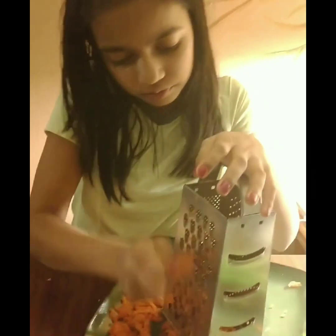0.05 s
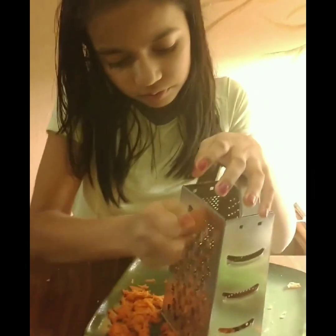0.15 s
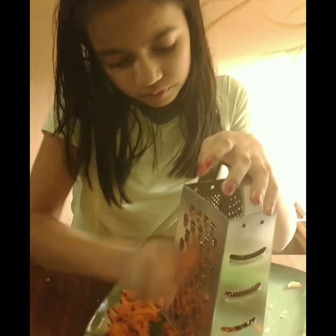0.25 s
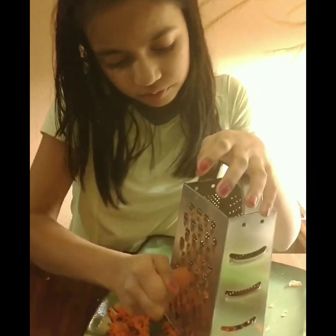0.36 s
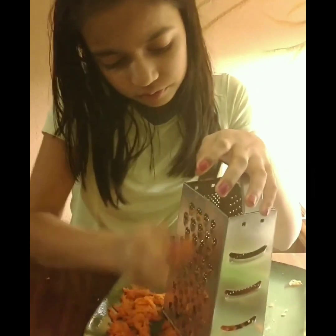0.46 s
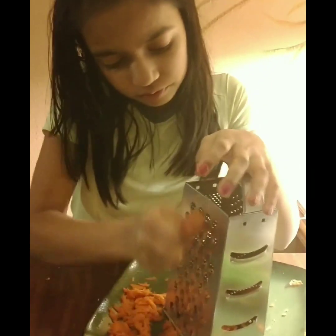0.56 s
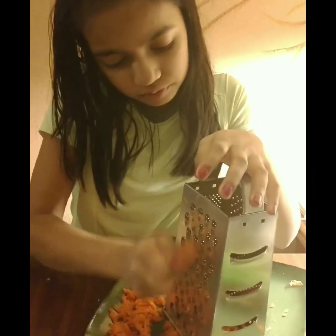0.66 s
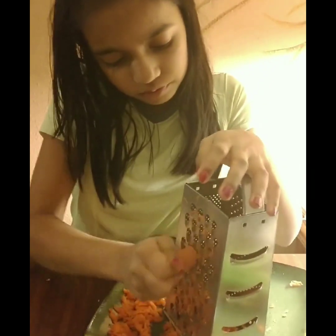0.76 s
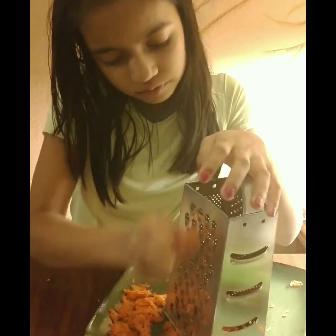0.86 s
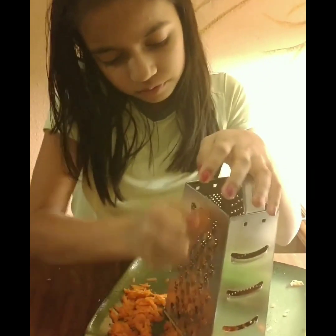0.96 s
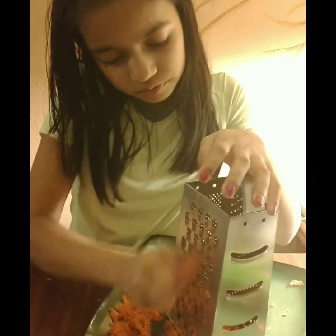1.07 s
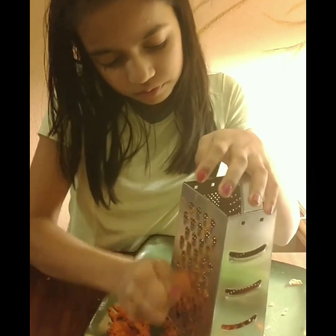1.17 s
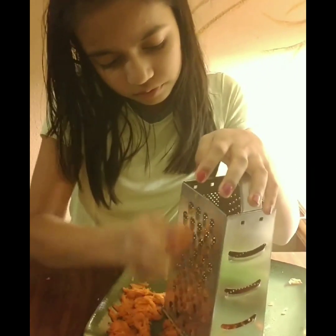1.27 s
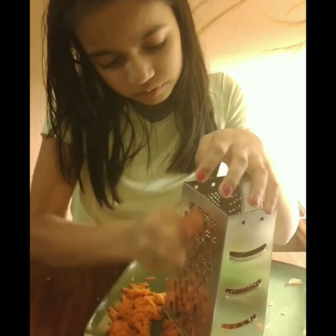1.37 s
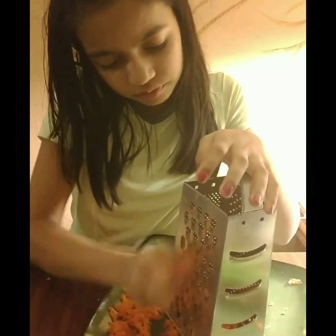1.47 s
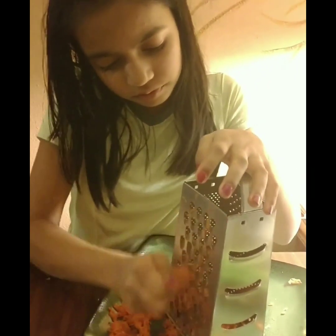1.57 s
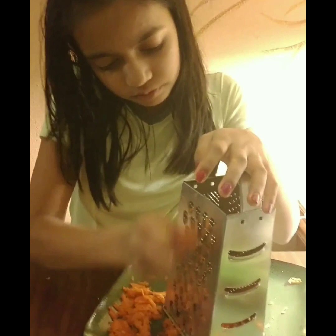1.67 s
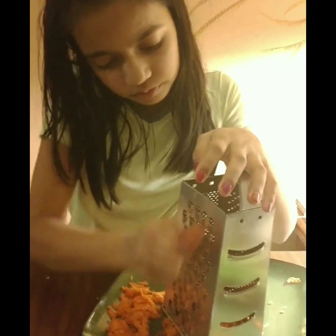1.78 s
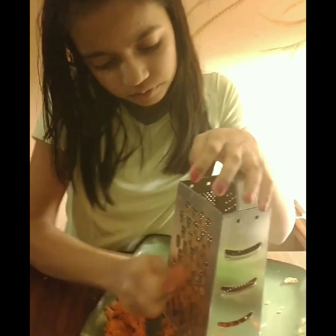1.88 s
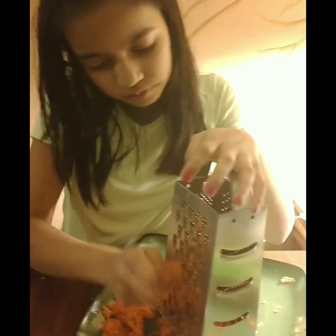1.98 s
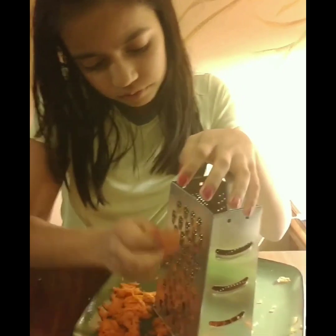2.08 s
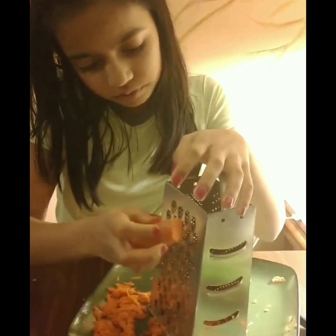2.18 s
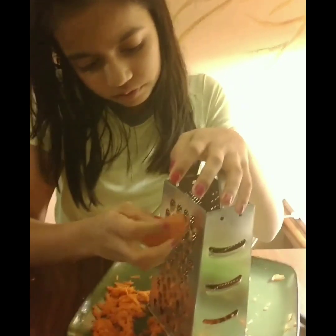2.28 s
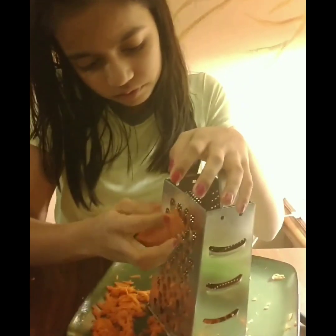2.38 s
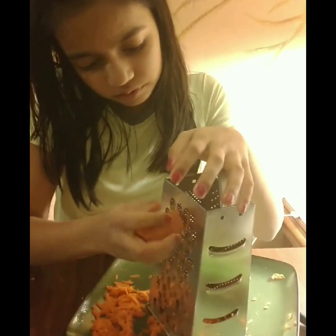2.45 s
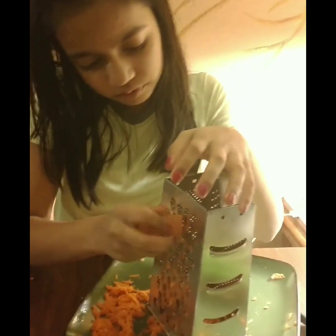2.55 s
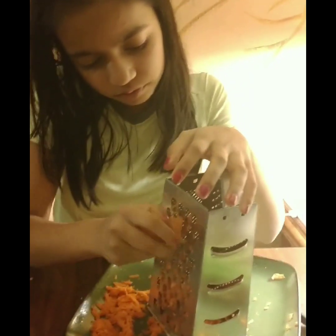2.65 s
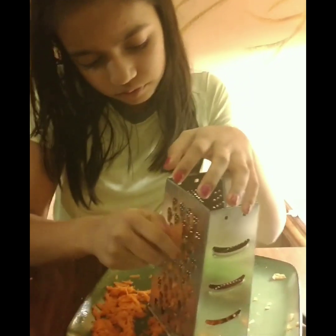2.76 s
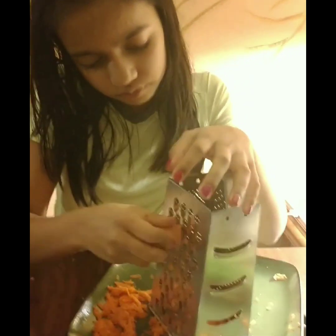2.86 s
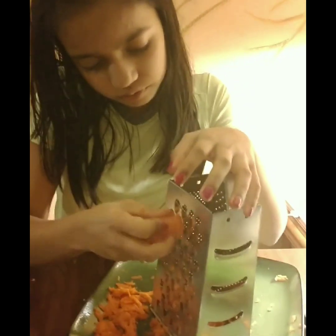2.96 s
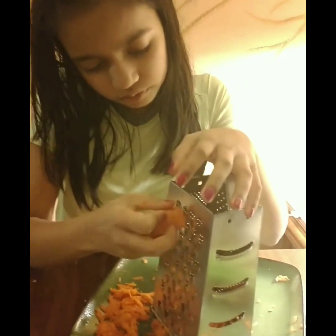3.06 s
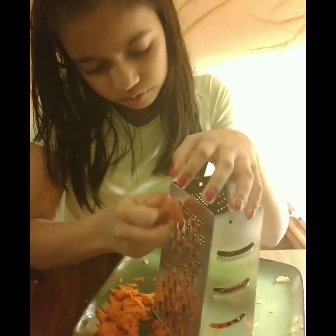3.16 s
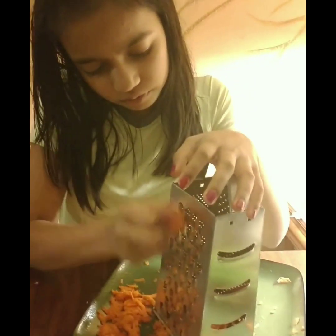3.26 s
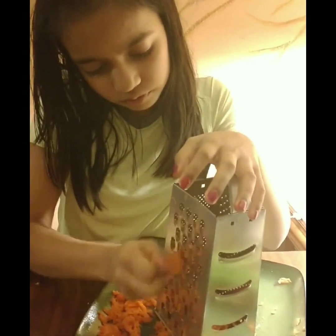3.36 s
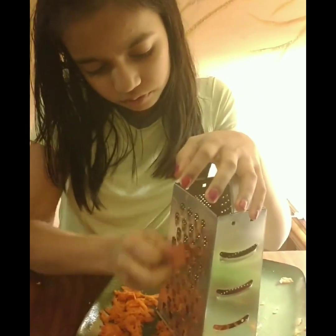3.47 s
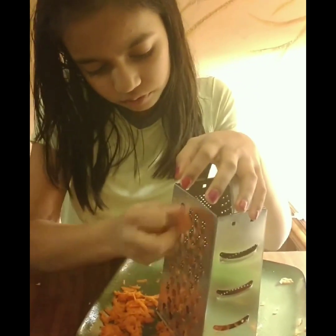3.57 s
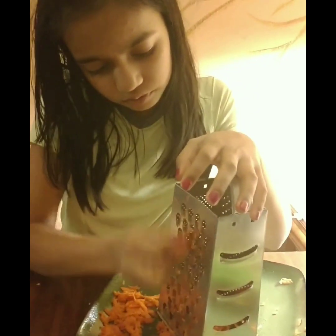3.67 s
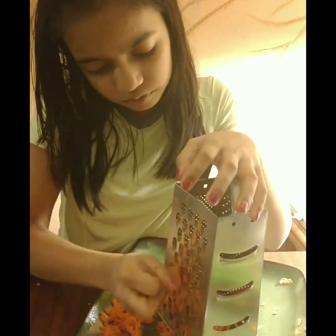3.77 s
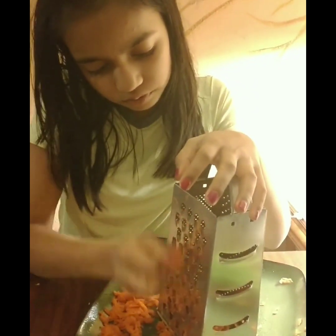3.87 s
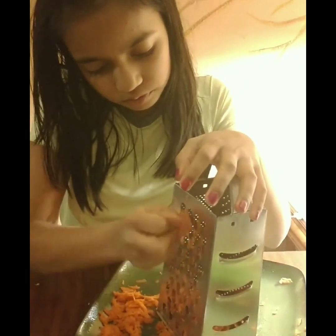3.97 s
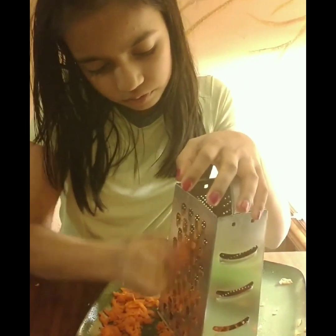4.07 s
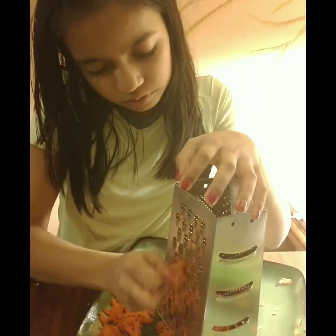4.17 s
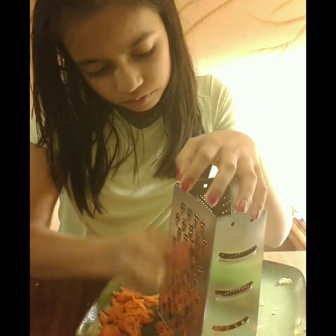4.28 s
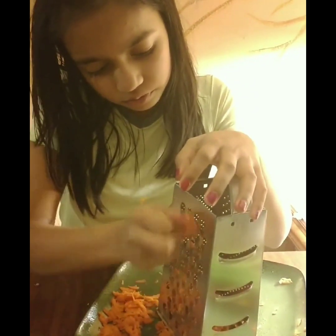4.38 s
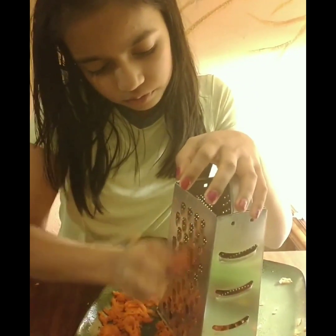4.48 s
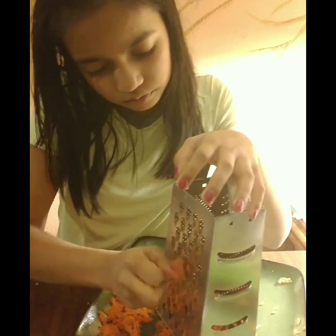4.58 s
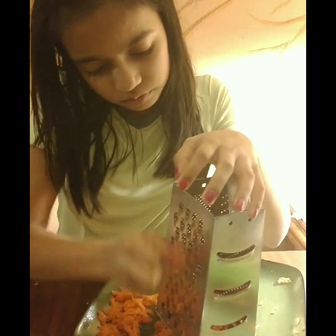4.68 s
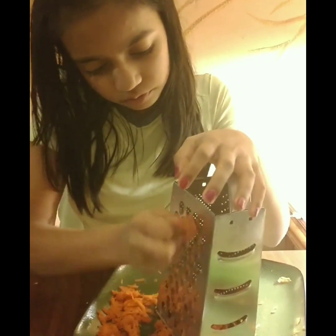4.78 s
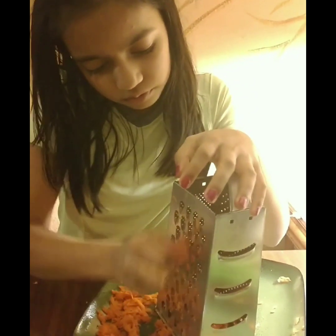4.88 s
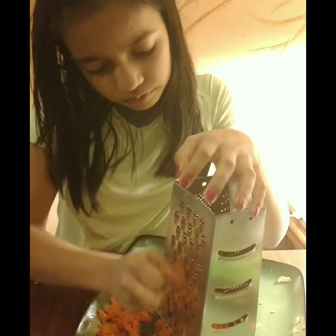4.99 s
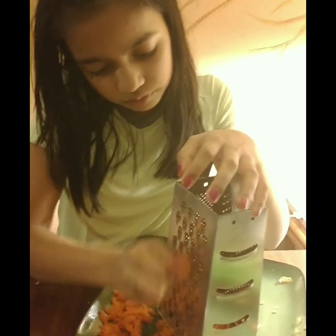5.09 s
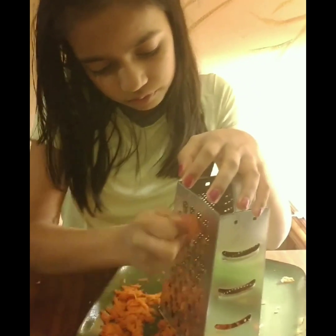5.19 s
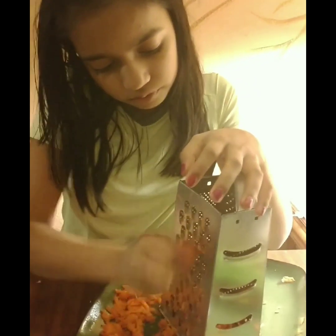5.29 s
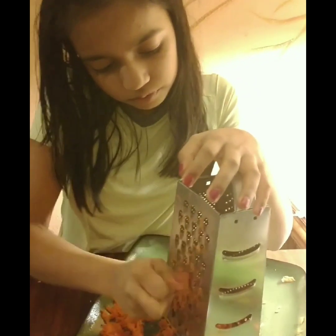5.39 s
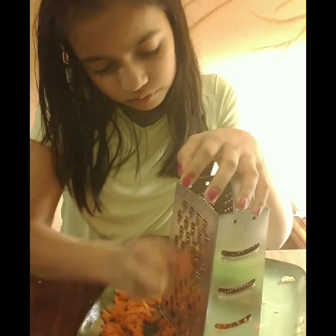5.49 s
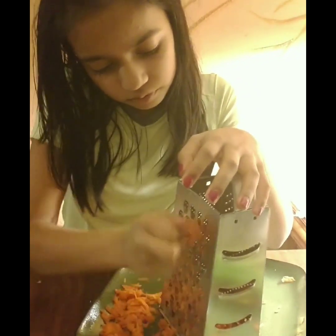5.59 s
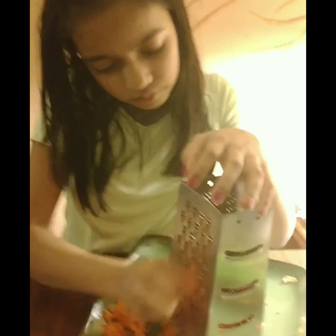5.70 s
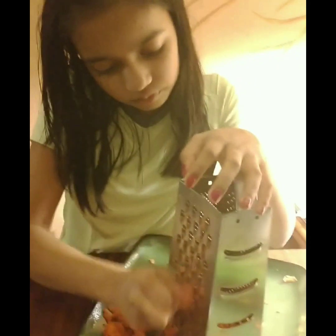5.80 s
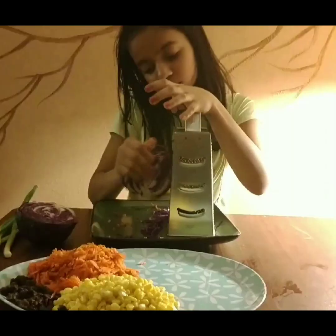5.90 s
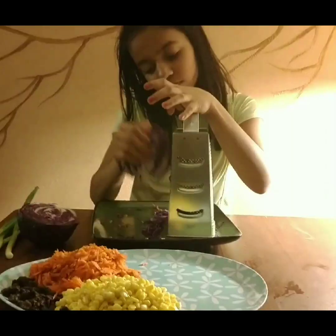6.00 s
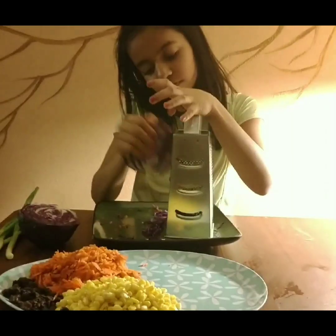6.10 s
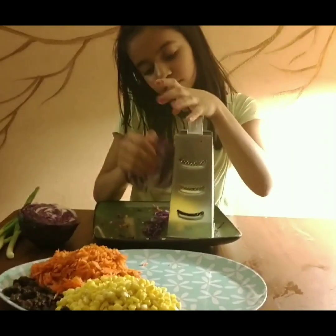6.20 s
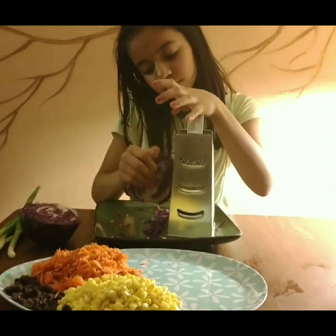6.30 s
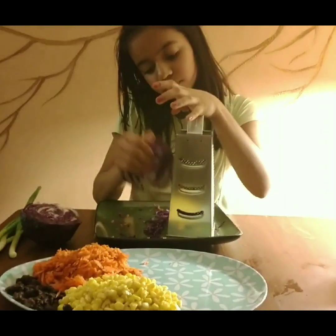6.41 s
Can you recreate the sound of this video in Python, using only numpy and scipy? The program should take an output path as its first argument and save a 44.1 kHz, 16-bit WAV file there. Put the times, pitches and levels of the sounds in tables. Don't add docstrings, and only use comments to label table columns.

```python
import sys
import numpy as np
from scipy import signal
from scipy.fft import rfft, irfft, next_fast_len
from scipy.io import wavfile
from scipy.ndimage import uniform_filter1d

SR = 44100
rng = np.random.default_rng(int(sys.argv[2]) if len(sys.argv) > 2 else 0)


def gain_from_decibels(decibels):
    exponent = np.asarray(decibels, float) / 20
    return 10 ** exponent


def to_wav(sig):
    pcm = np.clip(np.atleast_2d(sig), -1, 1) * 32767
    pcm = np.round(pcm).astype(np.int16)
    wavfile.write(sys.argv[1], SR, pcm.T)


N = 284332
SIZE = next_fast_len(N + SR)
HZ = np.arange(SIZE // 2 + 1) * SR / SIZE
TIME = np.arange(N) / SR
TOP_HZ = 15750

# bite t/s, build-up/s, hold/s, fibre hiss level/dB, weight on the tray/dB
STROKES = [(0.044, 0.041, 0.059, -42.5, -2), (0.41, 0.082, 0.038, -43, 1), (0.775, 0.072, 0.053, -44.5, 1),
           (1.17, 0.087, 0.057, -46, 3), (1.585, 0.072, 0.048, -43, 2.5), (1.957, 0.11, 0.029, -42, -2),
           (3.481, 0.051, 0.06, -53, -2.5), (3.825, .11, 0.028, -45.5, -2), (4.226, 0.077, 0.043, -45.5, 1),
           (4.598, 0.091, 0.059, -46.5, 3.5), (5.02, 0.049, 0.083, -47.5, 5),
           (5.425, 0.071, 0.062, -44, 4.5), (5.803, 0.084, 0.035, -45, 5.5)]
# t/s, build-up/s, hold/s, hiss level/dB, weight/dB
BRUSHES = [(-0.03, .03, 0.071, -52.5, 2.5), (0.385, 0.036, .02, -61, 5.5), (1.555, .03, .02, -60.5, 9),
           (3.808, 0.016, .01, -63, 5), (4.205, 0.011, .015, -61, 0), (4.985, 0.033, 0.022, -57.5, 3),
           (5.395, 0.033, .02, -62.5, 5), (2.575, 0.008, 0.015, -68, -4), (2.61, .05, 0.15, -72, -8),
           (2.9, 0.042, 0.041, -72.5, -3), (3.02, 0.02, 0.052, -70.5, -2.5), (3.2, 0.025, 0.035, -81, 4),
           (3.44, 0.014, 0.0088, -67, 2.5), (3.64, 0.025, 0.035, -68, 8), (4.1, 0.077, 0.013, -64, 1),
           (5.15, 0.071, 0.051, -58.5, -14), (5.625, 0.0087, .015, -63, 1)]
# t/s, build-up/s, hold/s, ring level/dB, weight/dB
SWELLS = [
    (4.08, .04, 0.055, -64, -8),
    (4.48, 0.083, 0.063, -56.5, -0.5),
    (5.2, 0.055, .1, -60.5, -10),
    (5.64, 0.09, 0.13, -57, 2.5),
]
# level/dB, share of the weight (dB per dB), lead/s, release/(dB per s), build-up power
CUTTING = [
    (12.5, 1.07, 0.018, 305.5, 0.66),
    (1, 0.23, 0.0061, 206, 0.62),
    (-0.5, 0.32, 0.0022, 254.5, 0.58),
    (0, 0.024, 0.0052, 330, 0.5),
]
SWELLING = [
    (-9, 0.76, 0, 300, .9),
    (-0.5, 1, 0.044, 310, 0.72),
    (1, 0, 0.0042, 260, 0.65),
    (-14, 0, 0.0039, 300, .9),
]
FAR_CUTTING = [
    (15.5, 1.2, 0, 350, 0.52),
    (12.5, 0.98, 0.0093, 250, 0.56),
    (-1, .3, 0.0045, 300, 0.73),
    (-1, 0, 0.0063, 350, 0.65),
]
# f/Hz, level/dB, t60/s
TRAY = [(148.5, -16, 0.24), (168.7, -9.5, 0.35), (242.2, 1, 0.12), (282, -4.5, 0.17), (309, 4, 0.073),
        (362.8, 2.5, 0.087), (416.3, -0.5, 0.052), (482, -12.5, 0.038), (539, -10.5, 0.13),
        (627, -16, 0.072), (670, -15.5, 0.053)]
WALLS = [(760, -8, 0.046), (830, -10.5, 0.14), (879, 0, 0.054), (982, -3, 0.051), (1063, -7, 0.069),
         (1188, -5.5, 0.042), (1332, -11, 0.037), (1424, -12, 0.064), (1581, -1.5, 0.043),
         (1709, -8.5, 0.07), (1910, -4.5, 0.022)]
TEETH = [(2320, 5, 0.011), (2500, 7.5, 0.012), (2775, 0, 0.039), (2924, 2.5, 0.024), (3290, -1.5, 0.03),
         (3289, -2, 0.071), (3744, -1.5, 0.017), (3850, -6, 0.032), (4230, -7.5, 0.018),
         (4700, -13.5, 0.0086), (5260, -11, 0.046), (5480, -5.5, 0.022)]
# f/Hz, level/dB per Hz
FIBRE = [(1000, -15), (2500, 0.5), (4300, -0.5), (5600, -1.5), (6600, 0), (7500, -0.5), (9000, -2.5),
         (11200, -0.5), (12200, -5.5), (14000, -3), (15700, -3)]

# t/s, peak level/dB, contact/ms, tick level/dB
LANDINGS = [(0.381, -21.5, 2.2, -32.5), (0.393, -19, 2.3, -29), (0.744, -31.5, 1.8, -31),
            (1.138, -27, 1.7, -38), (1.554, -19, 1.8, -33.5), (1.933, -30, 2.2, -47),
            (2.508, -35, 2.6, -34), (2.523, -42, 1.4, -40), (2.533, -43, 2, -40), (2.581, -44, 1.5, -20),
            (3.055, -43, 1.1, -35), (3.199, -53, 2.1, -33), (3.247, -45, 1.6, -34),
            (3.786, -33.5, 1.9, -24), (4.181, -32.5, 2.2, -41), (4.578, -24, 2.6, -31),
            (4.982, -23.5, 1.37, -29), (5.386, -31, 1.1, -45), (5.78, -23.5, 2.5, -36)]
# t/s, peak level/dB, contact/ms
SNAGS = [(0.05, -35.5, 1.3), (0.059, -16.5, 2.6), (0.14, -21.5, 1.8), (0.459, -16.5, 3.4),
         (0.786, -25.5, 1.8), (1.195, -33, 2.5), (1.281, -14.5, 2.5), (1.317, -22.5, 1.53),
         (1.979, -19, 2.3), (3.52, -25.5, 2.5), (3.836, -20.5, 2.4), (4.34, -20.5, 2), (5.037, -16, 2.25),
         (5.125, -21, 1.04), (5.444, -26, 1.2), (5.53, -23, 1.4), (5.46, -17.5, 1.5), (5.634, -36, 1.9),
         (5.861, -20, 3.4)]
# f/Hz, level/dB, t60/s
THUD = [(349.5, 1.8, 0.09)]
# t/s, peak level/dB, contact/ms, tick level/dB
SLAMS = [
    (1.015, -12.5, 0.9, -49),
    (4.226, -18.5, 1, -48),
]
# f/Hz, level/dB, t60/s
KNOCKED = [(150, -55, 0.2), (227, -6, 0.24), (369.6, 7.5, 0.091), (443, 5, 0.076), (533, 6, 0.16),
           (692, -2.5, 0.071), (796, -44, .1), (920, -9, .1), (954, -11, 0.087), (1087, -13, 0.19),
           (1404, -6, .12), (1420, -24, .1), (2590, -18.5, .12), (3340, -5.5, 0.033)]
# f/Hz, level/dB per Hz
RATTLE = [(150, -45), (300, -6), (600, 6.5), (1200, -10.5), (1800, -15), (3000, -26), (5000, -46)]

# t/s, build-up/s, hold/s, hiss level/dB, weight/dB
SCRAPES = [
    (6.04, .02, 0.024, -67.5, -2.5),
    (6.076, 0.012, 0.035, -75, 12),
    (6.2, 0.0074, 0.019, -63, -7.5),
    (6.25, 0.03, 0.029, -67.5, -3),
    (6.351, .004, .02, -56.5, -1),
    (6.374, 0.0053, 0.032, -47, 8),
    (6.42, 0.019, .03, -49.5, 1),
]
# t/s, peak level/dB, contact/ms, tick level/dB
BLOWS = [
    (6.074, -30, 0.51, -41),
    (6.201, -45, 0.6, -34),
    (6.35, -33, 0.72, -40),
    (6.375, -15.5, 0.41, -37),
    (6.398, -10, 0.73, -38),
    (6.436, -27, 0.45, -36),
]
# f/Hz, level/dB, t60/s
FAR_TRAY = [(262.3, -3, 0.21), (298, -6, 0.08), (384, -9, 0.19), (455, -13, 0.14), (535, -6, 0.065),
            (600, -13, 0.093), (686, -2, 0.058)]
FAR_WALLS = [(790, -7, 0.041), (858, -8, 0.14), (900, -8.5, 0.091), (1013, -4, 0.1), (1110, 2, 0.018),
             (1294, 0.5, 0.049), (1355, -5.5, 0.03), (1628, 4.5, 0.035), (2040, -9, 0.017)]

# f/Hz, level/dB per Hz
ROOM_AIR = [(12, -34), (20, -1), (100, -1), (180, 4.5), (240, -3), (510, -4.5), (680, -12.5), (1580, -18.5),
            (2420, -19.5), (4260, -28.5), (7400, -29), (9000, -32), (13000, -33), (15700, -32.5)]
# f/Hz, rms level/dB
HUM = [(59, -73.5), (119, -76.5), (190, -70)]


def near_grater():
    hand = [(STROKES, CUTTING), (BRUSHES, CUTTING), (SWELLS, SWELLING)]
    snag_tick_db = -35
    taps = LANDINGS + [row + (snag_tick_db,) for row in SNAGS]
    out = grating(hand, TRAY, WALLS, tray_db=0.0, wall_db=-0.76, jerk_db=2.5)
    out += knocks(taps, TRAY + THUD, rattle_db=-26.0)
    out += knocks(SLAMS, KNOCKED, rattle_db=-19.0)
    return out


def grating(spans, tray, walls, tray_db, wall_db, jerk_db):
    shake, box, ring, hiss = pressure(spans)
    catches = grains(400, scatter_db=jerk_db) * gain_from_decibels(1.6 * walk(45))
    slips = grains(1400, scatter_db=jerk_db) * gain_from_decibels(2.9 * walk(70))
    tearing = grains(9000, scatter_db=1.3) * gain_from_decibels(3.1 * walk(110) + 0.86 * walk(45))
    out = wandering(catches * shake * gain_from_decibels(tray_db), tray, shift_db=2.0)
    out += wandering((slips + 0.69 * catches) * box * gain_from_decibels(wall_db), walls, shift_db=5.5)
    out += wandering((tearing + 0.38 * slips) * ring * gain_from_decibels(-3.0), TEETH, shift_db=2.5)
    return out + fibre_hiss((tearing + 0.18 * slips) * hiss)


def fibre_hiss(force):
    fibre = colour(FIBRE) * table_top()
    fibre = fibre / rms(fibre[HZ < TOP_HZ])
    out = 0
    for k in range(8):
        stretch = np.clip(1 - np.abs(HZ / 2200 - k), 0, 1)
        out = out + through(force * gain_from_decibels(0.93 + 2.6 * walk(35)), stretch * fibre)
    return out


def pressure(spans):
    sag_db = 4
    power = np.zeros((4, N))
    for touches, layers in spans:
        for s, build_s, hold_s, db, weight_db in touches:
            at = slice(max(int((s - .1) * SR), 0), int((s + .8) * SR))
            since = TIME[at] - s
            sag = sag_db * np.clip((since - build_s) / hold_s, 0, 1)
            let_go_s = np.maximum(since - build_s - hold_s, 0)
            for k, (layer_db, share, lead_s, release, build_power) in enumerate(layers):
                rise = np.clip((since + lead_s) / (build_s + lead_s), 0, 1) ** build_power
                level_db = db + layer_db + share * weight_db - sag - release * let_go_s
                power[k, at] += (rise * gain_from_decibels(level_db)) ** 2
    return np.sqrt(power)


def grains(rate, scatter_db):
    when, size, sign = rng.random(N), rng.exponential(size=N), rng.standard_normal(N)
    clicks = (when < rate / SR) * np.sign(sign) * gain_from_decibels(scatter_db * size)
    return clicks / rms(clicks)


def walk(rate):
    k = int(SR / rate)
    held = np.repeat(rng.standard_normal(N // 8), k)[:N]
    return 0.82 * uniform_filter1d(uniform_filter1d(held, k), k)


def wandering(force, table, shift_db):
    out = 0
    for k, (hz, db, t60) in enumerate(table):
        r, w = np.exp(-np.log(1000) / (t60 * SR)), 2 * np.pi * hz / SR
        share = (-1) ** k * gain_from_decibels(db + shift_db * walk(22))
        out = out + signal.lfilter([0, r * np.sin(w)], [1, -2 * r * np.cos(w), r * r], force * share)
    return through(out, table_top()) / rms(modes(table) * table_top())


def modes(table, sense=-1):
    z, total = np.exp(-2j * np.pi * HZ / SR), 0
    for k, (hz, db, t60) in enumerate(table):
        r, w = np.exp(-np.log(1000) / (t60 * SR)), 2 * np.pi * hz / SR
        resonator = r * np.sin(w) * z / (1 - 2 * r * np.cos(w) * z + (r * z) ** 2)
        total = total + sense ** k * gain_from_decibels(db) * resonator
    return total


def knocks(events, body, rattle_db):
    delay_s = 0.00201
    push, tick, shaken = np.zeros((3, N + SR))
    lag = np.arange(SR // 8) / SR
    for (s, db, contact_ms, tick_db), noise in zip(events, rng.standard_normal((len(events), len(lag)))):
        start = int((s + delay_s) * SR)
        at = slice(start, start + len(lag))
        shape = np.sin(np.pi * np.minimum(lag * 1000 / contact_ms, 1))
        push[at] += gain_from_decibels(db) * shape / shape.sum()
        tick[at] += gain_from_decibels(db + tick_db) * noise * np.exp(-lag / 0.0038)
        shaken[at] += gain_from_decibels(db + rattle_db) * noise * np.exp(-lag / 0.027) * (lag > .003)
    response = modes(body, sense=0.96) * table_top()
    peak = np.abs(irfft(response, SIZE)[:SR // 20]).max()
    ring = through(push[:N], response) / peak * 1.97
    bright = through(tick[:N], colour(FIBRE) * table_top())
    loose = colour(RATTLE) * table_top()
    return ring + bright + through(shaken[:N], loose / rms(loose))


def far_grater():
    out = grating([(SCRAPES, FAR_CUTTING)], FAR_TRAY, FAR_WALLS, tray_db=2.0, wall_db=-3.5, jerk_db=2.5)
    return out + knocks(BLOWS, FAR_TRAY + FAR_WALLS, rattle_db=-18.5)


def table_top():
    spacing_hz, echo, dull_hz = 2133, 0.55, 5260
    return 1 - echo * np.exp(-2j * np.pi * HZ / spacing_hz) / (1 + (HZ / dull_hz) ** 4)


def small_room():
    t60_s, wet_db, radiate_hz = 0.73, -20, 174.5
    lag = np.arange(SR // 2) / SR
    tail = rng.standard_normal(len(lag)) * np.exp(-np.log(1000) * lag / t60_s) * (lag > .006)
    dull = 1 / np.sqrt(1 + (HZ / 4000) ** 2)
    room = 1 + gain_from_decibels(wet_db) * dull * rfft(tail / np.sqrt(np.sum(tail ** 2)), SIZE)
    ratio = 1j * HZ / radiate_hz
    return room * (ratio / (1 + ratio)) ** 3


def room_tone():
    air = through(rng.standard_normal(N), colour(ROOM_AIR) * table_top()) * gain_from_decibels(.7 * walk(9))
    hum = 0
    for hz, db in HUM:
        hum = hum + gain_from_decibels(db + 2.7 * walk(15)) * np.sqrt(2) * np.sin(2 * np.pi * hz * TIME)
    return air / rms(air) * gain_from_decibels(-59.5) + hum


def colour(points):
    hz, db = np.transpose(points)
    return gain_from_decibels(np.interp(np.log(HZ + 1), np.log(hz), db))


def through(x, response):
    return irfft(rfft(x, SIZE) * response, SIZE)[:N]


def rms(x):
    return np.sqrt(np.mean(np.abs(x) ** 2))


def scene():
    near, far = near_grater(), far_grater()
    room, tone = small_room(), room_tone()
    thin = through(tone, colour([(40, -22), (100, -13), (250, -2), (600, -2)]))
    cut_s, fade_s, resume_s, rise_s = 5.951, 0.01, 6.016, 0.0052
    before = np.clip((cut_s - TIME) / fade_s, 0, 1)
    after = np.clip((TIME - resume_s) / rise_s, 0, 1)
    mix = before * (through(near, room) + tone) + after * (through(far, room) + thin)
    return mix[None]


def band_limit(x):
    return signal.sosfilt(signal.butter(12, 15830, fs=SR, output="sos"), x)


def record(dry):
    cut = through(dry[0], 1. * (HZ < TOP_HZ))[None]
    return band_limit(cut - 1.2e-4)


dry = scene()
out = record(dry)
to_wav(out)
```